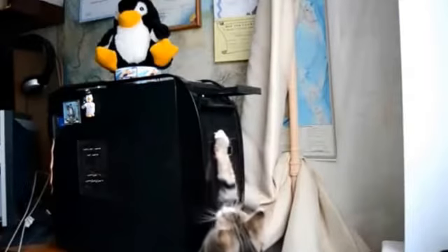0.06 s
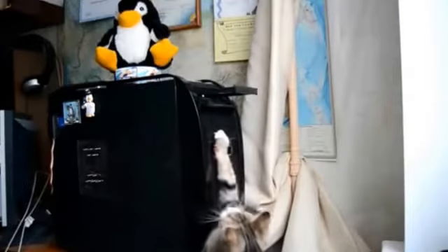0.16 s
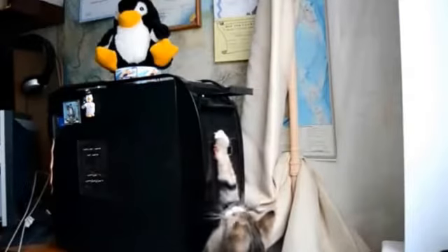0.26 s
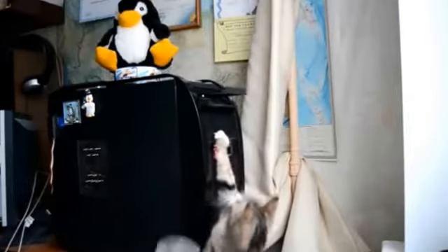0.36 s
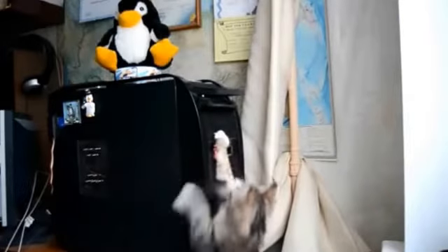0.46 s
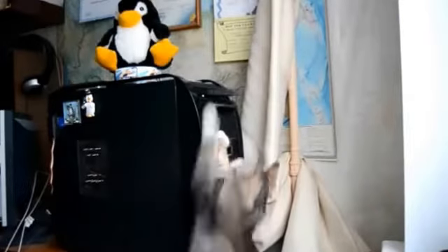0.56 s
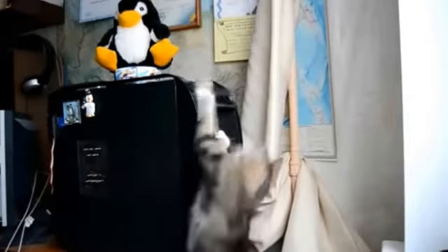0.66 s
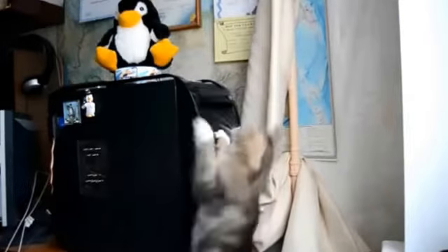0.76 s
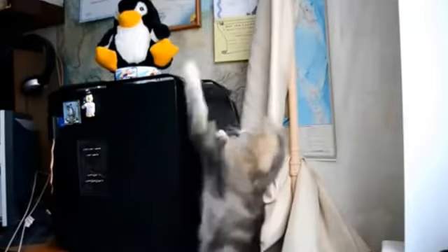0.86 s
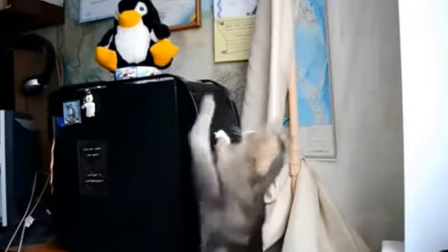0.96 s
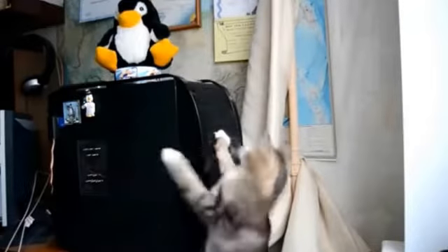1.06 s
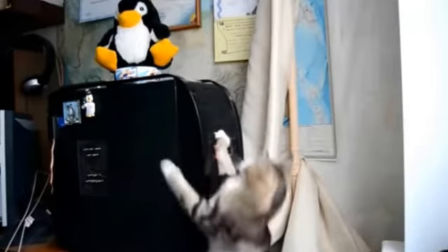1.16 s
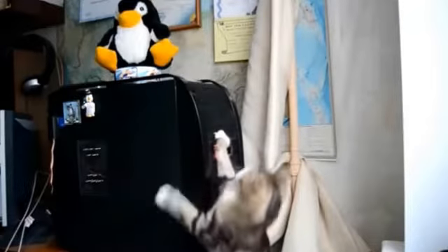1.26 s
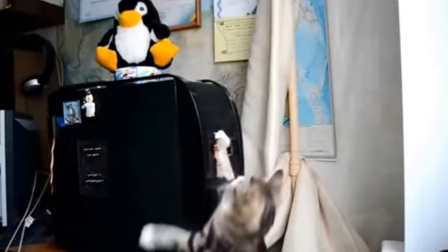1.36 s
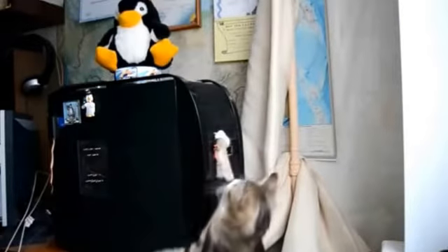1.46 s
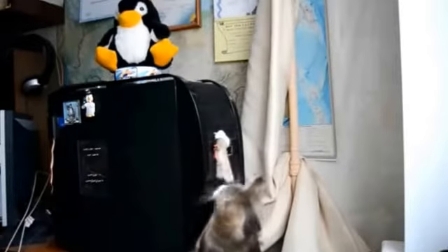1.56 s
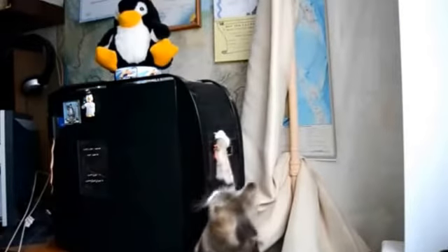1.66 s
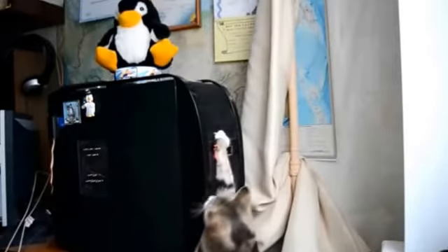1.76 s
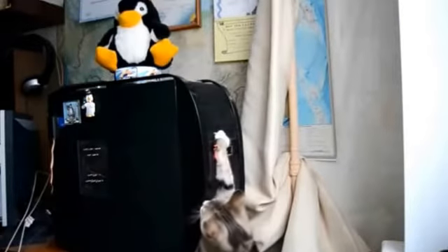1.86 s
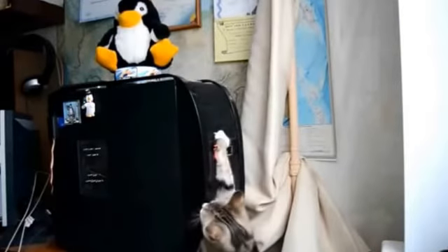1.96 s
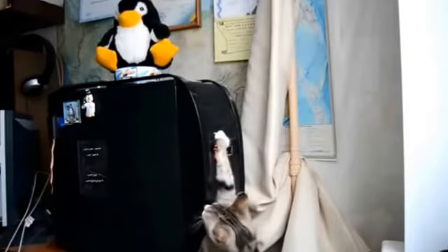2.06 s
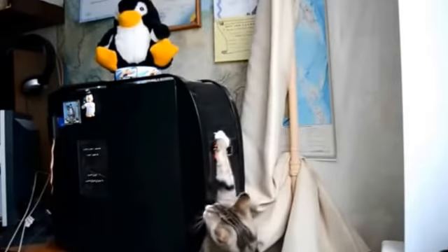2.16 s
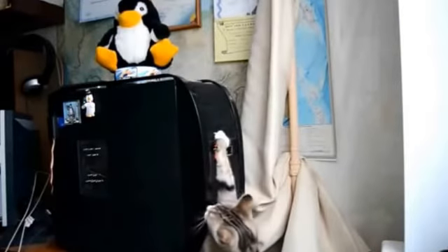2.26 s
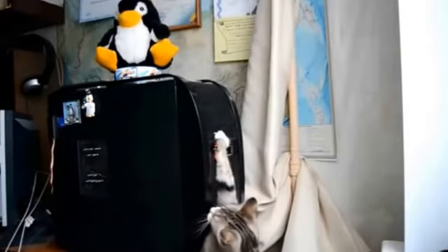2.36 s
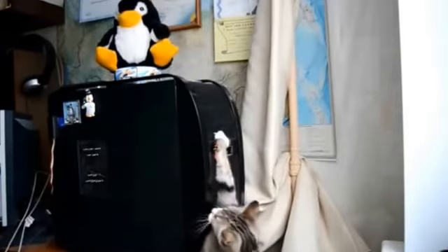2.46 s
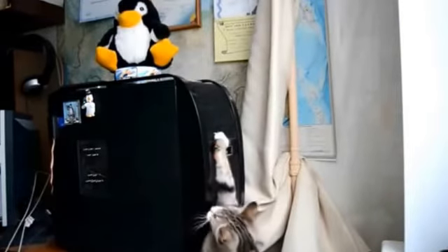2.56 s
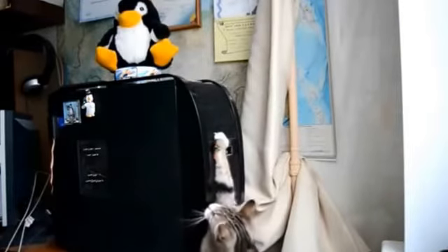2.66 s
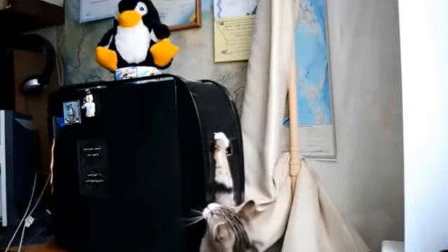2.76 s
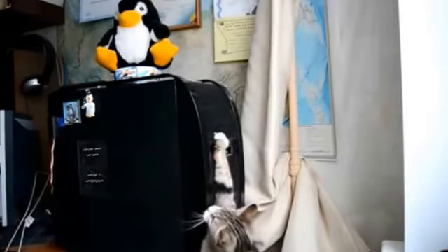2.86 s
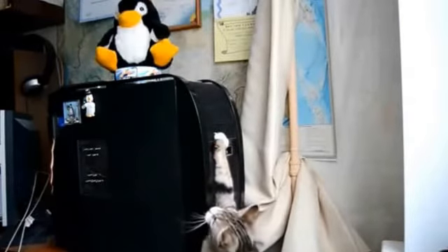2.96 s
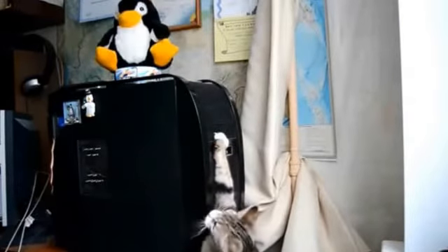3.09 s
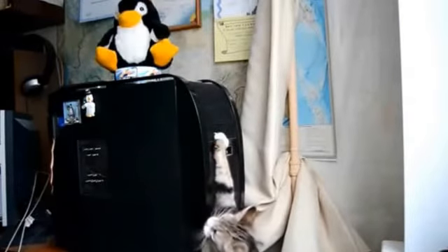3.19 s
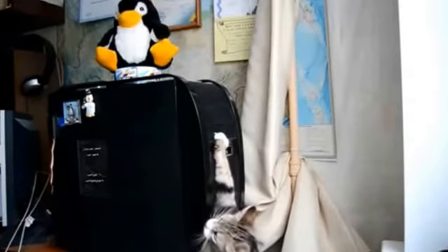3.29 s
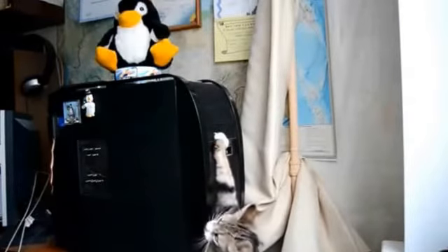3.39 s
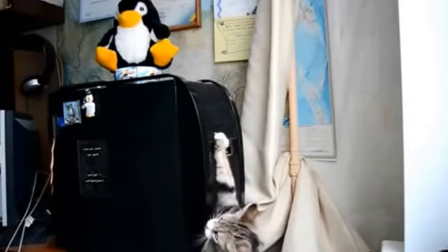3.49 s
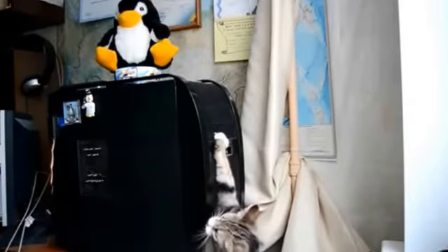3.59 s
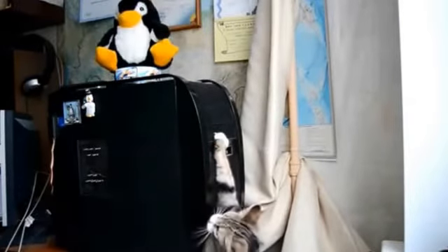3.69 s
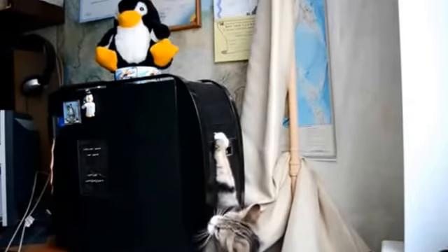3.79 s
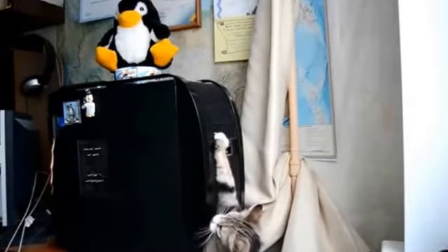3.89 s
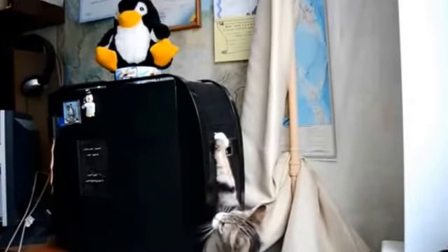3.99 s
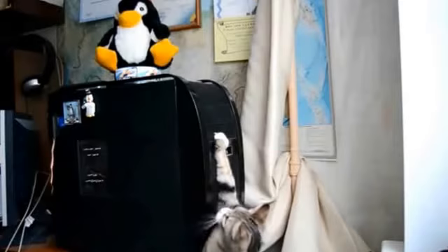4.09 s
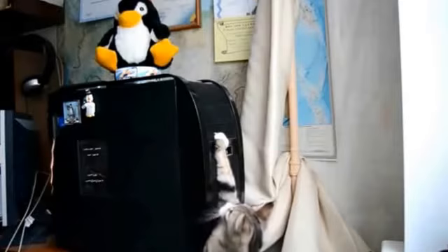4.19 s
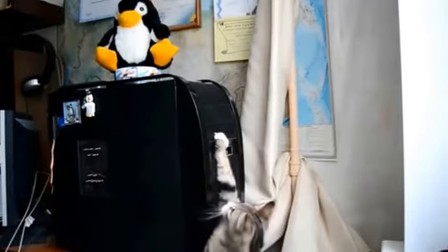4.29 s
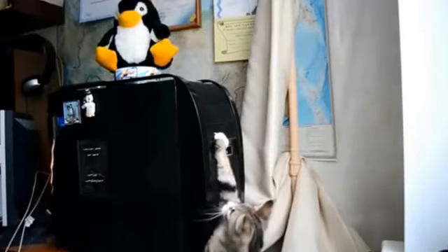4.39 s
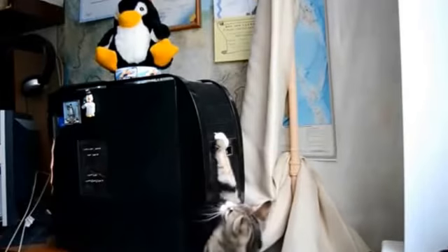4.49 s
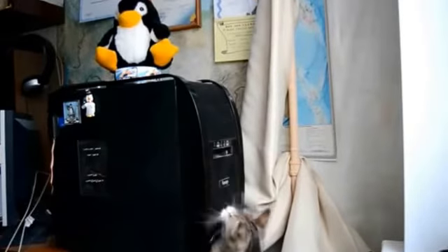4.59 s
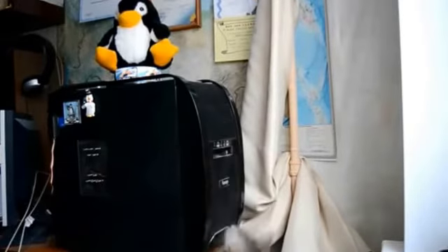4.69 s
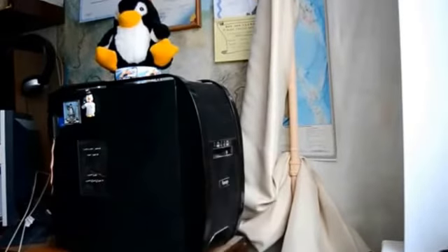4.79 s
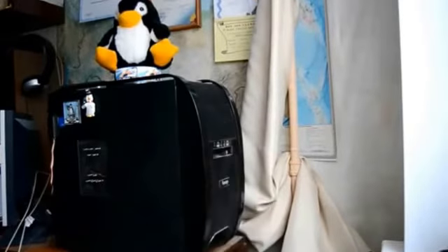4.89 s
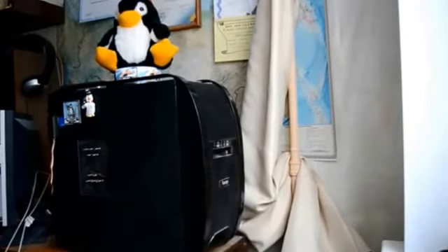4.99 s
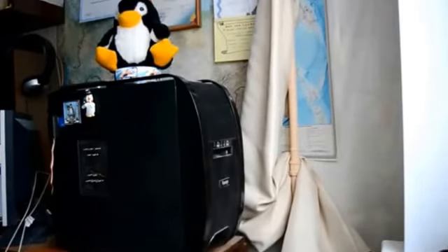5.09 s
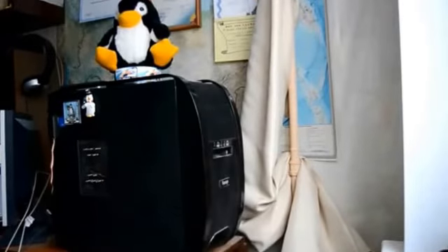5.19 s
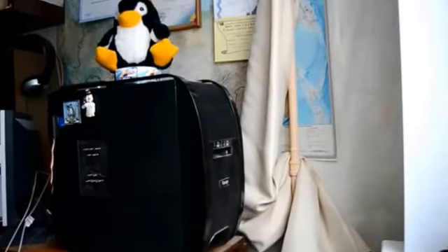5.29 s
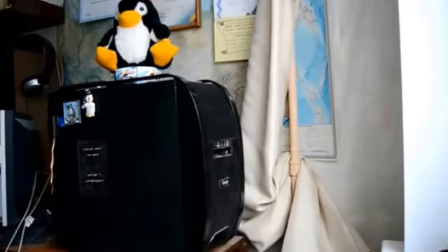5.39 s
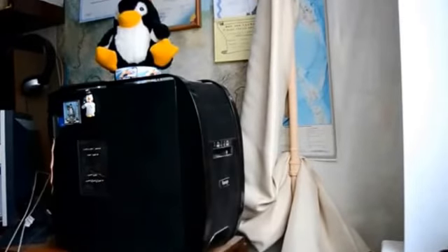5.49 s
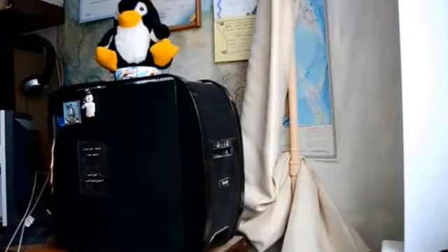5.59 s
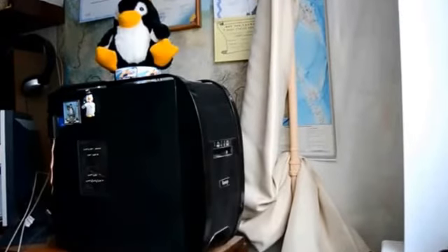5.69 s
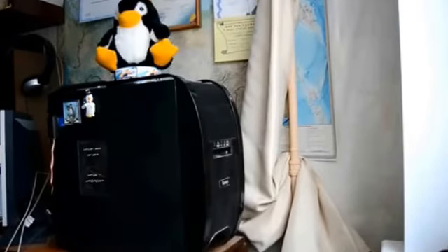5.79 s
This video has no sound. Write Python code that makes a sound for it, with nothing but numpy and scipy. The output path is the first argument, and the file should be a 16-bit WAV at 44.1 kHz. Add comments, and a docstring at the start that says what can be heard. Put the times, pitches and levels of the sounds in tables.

```python
"""A cat paws at the front of a computer case beside a curtain in a small furnished room.
Fans hum throughout (filtered noise), and fur and curtain rustle from the start (clumped noise grains).
Paws soon thud and claws tick and drag on plastic and sheet metal (bursts of tiny slips, ringing the case).
Early on the disc tray whirs shut (noise through resonances); late on, between blows, a trinket jangles once.
Echoes of the paws, rustle and trinket are added, then the microphone colours everything."""
import sys
import numpy as np
from scipy import signal
from scipy.fft import rfft, irfft, next_fast_len
from scipy.io import wavfile

SR = 44100
rng = np.random.default_rng(int(sys.argv[2]) if len(sys.argv) > 2 else 0)


def transcribe(signal):
    """Save signal, clipped to [-1, 1], as a 16-bit WAV file at the path in sys.argv[1]."""
    frames = np.atleast_2d(signal).T
    limited = np.clip(frames, -1, 1)
    pcm = np.round(limited * 32767).astype(np.int16)
    wavfile.write(sys.argv[1], SR, pcm)


N = 257978  # length in samples

# Smooth air noise of the fans: pitch_hz, relative_level_db
FAN_AIR = [(15, -45.5), (25, -8), (80, -10), (133, 1.5), (199, -21), (269, -1.5), (338, -12.5), (506, -3),
           (619, -4.5), (952, -2), (1980, -10), (9490, -31.5), (10500, -42.5), (13600, -75.5),
           (22000, -120)]
# Fan rumble and tones: pitch_hz, width_hz, level_db
FAN_TONES = [(34.11, 15, -73.5), (124, 97, -70), (254.6, 14, -74), (956, 63, -70), (1346.5, 16, -72.5)]
# Fur and curtain moving: time_s, relative_level_db, brightness_db
RUSTLE = [(0.0, -54, -0.5), (0.24, -58, 6), (0.68, -58, 3), (0.85, -51, 6), (1.09, -43.5, -11),
          (1.25, -56.5, -7.5), (1.46, -63.5, -3), (1.78, -66, -1), (2.1, -59.5, 3), (2.39, -66, 1),
          (2.7, -62, 0.5), (2.83, -73, -5.5), (3.2, -58.5, -0.5), (4.01, -73, 2.5), (4.6, -62, -6),
          (4.8, -46.5, 5.5), (4.92, -42, -17.5), (5.05, -62, -18), (5.21, -66.5, -9), (5.85, -65, -4.5)]
# Knocks: start_s, low_panel_db, pad_step_db (pad against low panel), high_step_db (high against low
# panel), claw_step_db (claw against high panel), drag_s (time to fade to about a third)
KNOCKS = [(.086, -34.5, -16.5, 1.5, -8.5, 0.0071), (.798, -21.5, -10.5, 2.5, 2.5, 0.011),
          (0.977, -40.5, -6, -1.5, -2.5, 0.0094), (.993, -26.5, -4, -0.5, -13, 0.014),
          (1.015, -22, -11.5, 0, -1.5, 0.028), (1.042, -15, -17.5, 2.5, -0.5, 0.0054),
          (1.061, -12.5, -19.5, -7.5, -0.5, 0.0083), (1.108, -21, -14, 1, 0, 0.011),
          (1.129, -25, -15.5, 2, -1.5, 0.013), (1.209, -21, -6.5, -2, -13.5, 0.014),
          (2.188, -60, -4.5, 1.5, -2.5, 0.012), (2.227, -55.5, -9.5, 6, -2.5, 0.012),
          (2.73, -33, -18, 5, -2, .011), (4.638, -26.5, -12.5, 5, -5.5, .01),
          (4.962, -42, -3, -17, 6.5, 0.0041), (5.018, -38.5, -1, -8, -5.5, 0.014),
          (5.137, -55.5, 5.5, -5.5, -2, 0.013), (5.484, -11, -12, -4.5, -12, 0.01),
          (5.57, -44.5, -2.5, 5, -9.5, 0.0094)]
# Short bursts that swell in without a sharp blow, mostly rubs: mid_rise_s (half the rise time after
# the burst begins), then the other columns as for knocks
SOFT_STARTS = [(0.046, -40.5, -23, 0, -3.5, .016), (.62, -44.5, -13, -10, -11, 0.018),
               (.773, -17, -14, 0, -1.5, .014), (.82, -21.5, -13, 3.5, 0, 0.015),
               (0.929, -43.5, -6, 2, 0, .0082), (1.074, -15, -17, -4, -4.5, 0.012),
               (1.807, -39, -14.5, 9.5, -9.5, 0.0085), (1.945, -56, -5.5, 6, -3.5, .011),
               (2.546, -49.5, -8.5, 2.5, -7.5, 0.015), (2.673, -45, -12, -14.5, -4, .011),
               (2.763, -41, -2.5, 1.5, 1, 0.011), (3.009, -56.5, -6, 2.5, -5, 0.011),
               (3.063, -32, -2.5, -8.5, -9.5, .012), (3.214, -55.5, -7, 0, -2, .011),
               (3.244, -55, 6, 1, -9, 0.013), (3.348, -50.5, -10, 6.5, -10, 0.012),
               (3.399, -49.5, -8.5, -2.5, -5.5, .013), (3.71, -42, -20, 3, -4.5, 0.016),
               (3.769, -59, -6, 0.5, 1, .013), (4.658, -32.5, -15, -4.5, 0, 0.014),
               (4.762, -50, -3, 6.5, -1.5, 0.018), (4.865, -31.5, -8.5, -2.5, -4.5, 0.034),
               (4.904, -28, -13, 2, -9.5, 0.0078), (4.925, -35, -4.5, -17, -14, 0.008),
               (4.974, -35, 7, -23, 4, 0.0084), (5.049, -39.5, -4.5, -2, -11.5, 0.011)]
# Borders between the seven contact layers, from thump up to rattle: edge_hz
LAYER_EDGES_HZ = [75, 150, 400, 780, 1350, 2500, 4700, 16000]
# How readily each contact layer gives off sound: gain_db
LAYER_DB = [26.1, 18.9, 15.17, 12.56, 10.7, 9.75, 3.8]
# Air and walls of the case: pitch_hz, relative_level_db, fade_s (to fall 60 dB)
BOX = [(87, 1.5, 0.11), (110, 1, 0.05), (134.5, 2, 0.17), (258, -2.5, 0.11), (400, -9, 0.19)]
# Front panel: pitch_hz, relative_level_db, fade_s (to fall 60 dB)
PANEL = [(432, -10, 0.26), (659, -3, 0.023), (944.4, -2, 0.22), (1029, -3, 0.21), (1158, 4, 0.06),
         (1357, -0.5, 0.083), (1653, -3, 0.04), (2110, -21, 0.026), (2158, -6.5, 0.11), (2570, -8, 0.033)]
# Tray motor: time_s, relative_level_db
TRAY = [(0.22, -86), (0.256, -61), (0.452, -48.5), (0.522, -61), (0.672, -53), (0.76, -66)]
# Resonances of the tray: pitch_hz, width_hz, relative_level_db
TRAY_RINGS = [(455, 15, -2), (638, 8.6, -6.5), (1380, 35, 3.5), (2260, 70, -37), (3190, 29, -6)]
# Small hanging metal thing: pitch_hz, relative_level_db, fade_s (to fall 60 dB)
TRINKET = [(7100, -5, 0.014), (8280, 0.5, 0.024), (9880, 0.5, 0.016), (10700, -6, .01)]
# How long the room's echoes last: pitch_hz, fade_s (to fall 60 dB)
ROOM = [(80, 0.47), (260, 0.3), (700, .22), (1840, 0.2), (4850, 0.15), (11000, 0.12)]
# Microphone colour: pitch_hz, gain_db
MICROPHONE = [(20, -10), (200, 2), (7000, 0.5), (7900, -2), (9200, 3.5), (10300, -3), (12000, -29.5),
              (13500, -20.5), (16000, -29.5)]


def from_db(db):
    """Turn decibels into a plain multiplier."""
    return 10 ** (np.asarray(db) / 20)


def rms_one(x):
    """Scale a sound to an average (rms) strength of 1."""
    return x / np.sqrt(np.mean(x ** 2) + 1e-20)


def in_time(rows):
    """Draw each column as a line over the whole sound, from rows that start with a time."""
    times_s, *columns = np.transpose(rows)
    clock_s = np.arange(N) / SR
    return [np.interp(clock_s, times_s, column, right=column[-1]) for column in columns]


def at_hz(points, hz):
    """Read a curve of (pitch, value) at any pitch, along a logarithmic pitch scale."""
    curve_hz, values = np.array(points).T
    return np.interp(np.log(hz), np.log(curve_hz), values)


def band(x, low_hz, high_hz, order=2):
    """Keep mainly the pitches between two limits."""
    sos = signal.butter(order, [low_hz, high_hz], "band", fs=SR, output="sos")
    return signal.sosfilt(sos, x)


def coloured(x, spectrum):
    """Raise and lower each pitch as a (pitch_hz, gain_db) curve says."""
    size = next_fast_len(N + 4096)
    hz = np.maximum(np.arange(size // 2 + 1) * SR / size, 1)
    gain = from_db(at_hz(spectrum, hz))
    return irfft(rfft(x, size) * gain, size)[:N]


def drift(rate_hz):
    """Slow random wandering of spread 1: smoothed noise, made at every 40th sample."""
    step, settle = 40, 2000
    r = np.exp(-2 * np.pi * rate_hz * step / SR)
    noise = rng.standard_normal(N // step + settle + 2)
    slow = signal.lfilter([1], [1, -2 * r, r * r], noise)[settle:]
    return np.interp(np.arange(N) / step, np.arange(len(slow)), rms_one(slow))


def ring(x, modes):
    """Struck resonances side by side, each a fading tone, with alternating signs."""
    out = 0
    for k, (hz, level_db, fade_s) in enumerate(modes):
        r = from_db(-60 / (fade_s * SR))
        angle = 2 * np.pi * hz / SR
        strike = [0, from_db(level_db) * np.sin(angle)]
        out = out + (-1) ** k * signal.lfilter(strike, [1, -2 * r * np.cos(angle), r * r], x)
    return out


def whistle(hz, width_hz):
    """Noise through one resonance; rms 1."""
    r = np.exp(-np.pi * width_hz / SR)
    feedback = [1, -2 * r * np.cos(2 * np.pi * hz / SR), r * r]
    return rms_one(signal.lfilter([1, 0, -1], feedback, rng.standard_normal(N)))


def grains(per_s, spread_db):
    """Tiny slips at random moments with uneven sizes; rms 1."""
    size_db = spread_db * np.minimum(rng.exponential(1, N), 4)
    sizes = from_db(size_db) * rng.choice([-1, 1], N)
    happens = rng.random(N) < per_s / SR
    return rms_one(sizes * happens)


def fans():
    """Fans stir smooth, gently wavering air noise, with a few rumbles and tones."""
    air_db = -63 + 0.8 * drift(rate_hz=3.0)
    air = from_db(air_db) * rms_one(coloured(rng.standard_normal(N), FAN_AIR))
    tones = sum(from_db(db) * whistle(hz, width_hz) for hz, width_hz, db in FAN_TONES)
    return air + tones


def rustle():
    """Fur and cloth rub in clumps of grains; brightness lifts the top and sinks the dull part."""
    level_db, brightness_db = in_time(RUSTLE)
    clumps_db = 2.8 * drift(rate_hz=4.7)
    dull = rms_one(band(rng.standard_normal(N), 110, 820))
    mid = rms_one(band(grains(per_s=7100.0, spread_db=0.0), 740, 3600))
    bright = rms_one(band(grains(per_s=3600.0, spread_db=3.5), 5000, 10000))
    mix = from_db(-5.5 - brightness_db) * dull + mid + from_db(-12.5 + brightness_db) * bright
    return from_db(level_db + clumps_db - 6.5) * mix


def forces():
    """Slips swell and fade over each drag; a knock starts with a sharp blow. One force per layer."""
    blow_db = 14  # first blow of a knock against its slips
    knock_rise_s, soft_rise_share = 0.0005, 0.36  # a soft start swells over this share of its drag
    thump_db = -11.5  # floor thump under the pad thud
    boxy_share, tick_share = 0.45, 0.99  # of the pad step, and of the claw step
    rattle_steps = 2.3  # claw steps from the high panel up to the rattle
    out = np.full((len(LAYER_DB), N), 1e-18)
    slips = grains(per_s=9000.0, spread_db=2.0)
    knocks = [(*row, from_db(blow_db), knock_rise_s) for row in KNOCKS]
    soft_starts = [(*row, 0, soft_rise_share * row[-1]) for row in SOFT_STARTS]
    for time_s, panel_db, pad_db, high_db, claw_db, drag_s, blow, rise_s in knocks + soft_starts:
        start = round((time_s - rise_s / 2) * SR)
        drag_s = max(drag_s, 0.001)
        length = min(int(6 * (rise_s + drag_s) * SR), N - start)
        t = np.arange(length) / SR
        swell = (1 - np.exp(-t / rise_s)) ** 2
        force = slips[start:start + length] * swell * np.exp(-t / drag_s)
        force[0] += blow
        # thump, thud, boxy, low panel, high panel, tick, rattle
        layer_db = np.array([pad_db + thump_db, pad_db, boxy_share * pad_db, 0, high_db,
                             high_db + tick_share * claw_db, high_db + rattle_steps * claw_db])
        out[:, start:start + length] += from_db(panel_db + layer_db)[:, None] * force
    return out


def contacts():
    """Soft paws drive the box, blows ring the panel, claws tick and rattle above."""
    layers = []
    for force, db, low_hz, high_hz in zip(forces(), LAYER_DB, LAYER_EDGES_HZ, LAYER_EDGES_HZ[1:]):
        layers.append(from_db(db) * band(force, low_hz, high_hz, order=3))
    thump, thud, boxy, low, high, tick, rattle = layers
    soft = thump + thud
    firm = boxy + low + high
    box_ring = from_db(-51.5) * ring(soft, BOX)
    panel_ring = from_db(-51) * ring(firm, PANEL)
    return soft + box_ring + firm + panel_ring + tick + rattle


def tray():
    """Gear noise in the resonances of the tray, stopping when it shuts."""
    level_db, = in_time(TRAY)
    t = np.arange(N) / SR
    running = (t > TRAY[0][0]) & (t < TRAY[-1][0])
    whir = rms_one(sum(from_db(db) * whistle(hz, width_hz) for hz, width_hz, db in TRAY_RINGS))
    gear_noise = from_db(1.5) * rms_one(band(rng.standard_normal(N), 300, 2800))
    return from_db(level_db - 5.0) * (whir + gear_noise) * running


def trinket():
    """A small hanging metal thing is brushed: a short run of uneven touches rings it."""
    t = np.arange(N) / SR - 4.118  # seconds since the jangle began
    fade = (t > 0) * np.exp(-np.maximum(t, 0) / 0.038)
    touches = grains(per_s=1400.0, spread_db=1.5) * fade
    return from_db(-81) * ring(touches + 1e-18, TRINKET)


def reflections():
    """One set of dense echoes: noise that dies band by band after a short gap; energy 1."""
    gap_s = 0.00043
    t = np.arange(SR // 2) / SR
    edges_hz = 40 * 2 ** np.arange(0, 9.1, 0.5)  # half-octave bands
    white = rng.standard_normal((2, len(t)))  # neighbouring bands use different noise
    tail = 0
    for k, (low_hz, high_hz) in enumerate(zip(edges_hz, edges_hz[1:])):
        fade_s = at_hz(ROOM, np.sqrt(low_hz * high_hz))
        tail = tail + band(white[k % 2], low_hz, high_hz) * from_db(-60 * t / fade_s)
    tail *= 1 - np.exp(-(t / gap_s) ** 2)
    return tail / np.sqrt(np.sum(tail ** 2))


def room(x, count=4):
    """Echoes fade steadily around several sets of dense noise, so no one pattern of tones stands out."""
    turn = np.arange(N) / SR * 20 % count  # 20 sets per second, in a circle
    out = 0
    for k in range(count):
        distance = np.abs((turn - k + count / 2) % count - count / 2)
        share = np.clip(1 - distance, 0, 1)
        out = out + signal.fftconvolve(x * np.sqrt(share), reflections())[:N]
    return from_db(-3) * out


def scene():
    """Paws, rustle and trinket get echoes; the tray and fans are added without."""
    near = rustle() + contacts() + trinket()
    return (fans() + near + room(near) + tray())[None]


def record(dry):
    """Microphone colour and a trace of amplifier hiss, then the top is cut."""
    hiss = from_db(-91) * rng.standard_normal(N)
    heard = coloured(dry[0], MICROPHONE) + hiss
    top_cut = signal.cheby2(12, 70, 15700, fs=SR, output="sos")  # 70 dB down from 15700 Hz up
    return signal.sosfilt(top_cut, heard[None])


dry = scene()
out = record(dry)
transcribe(out)
```